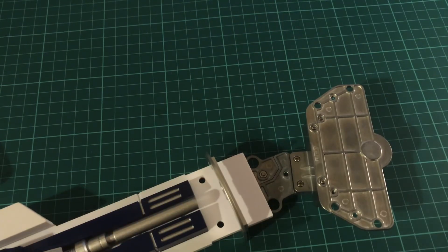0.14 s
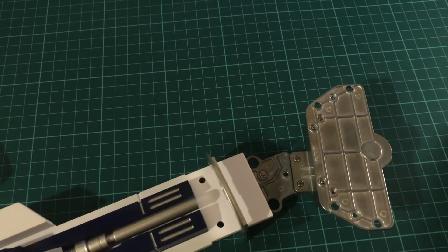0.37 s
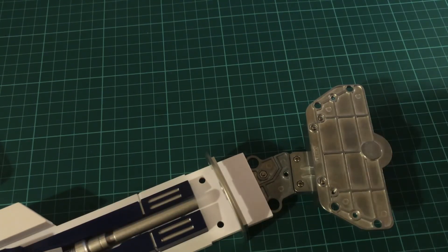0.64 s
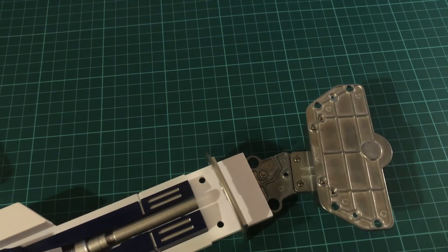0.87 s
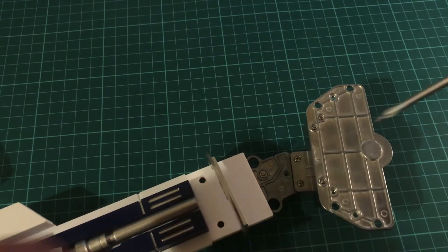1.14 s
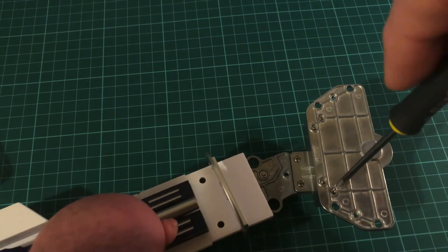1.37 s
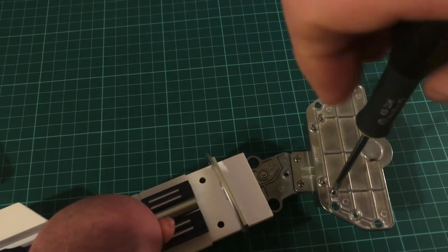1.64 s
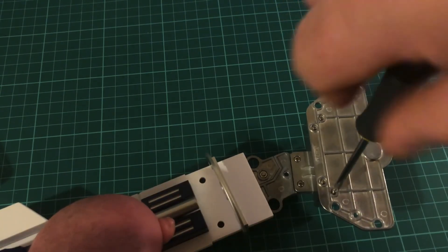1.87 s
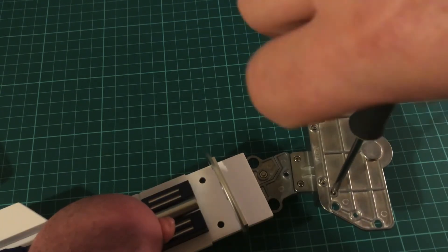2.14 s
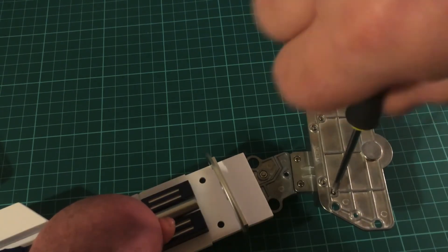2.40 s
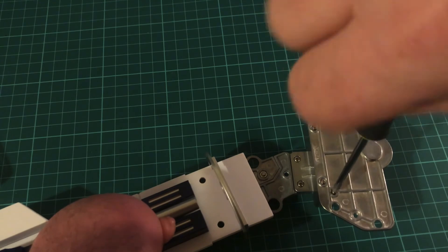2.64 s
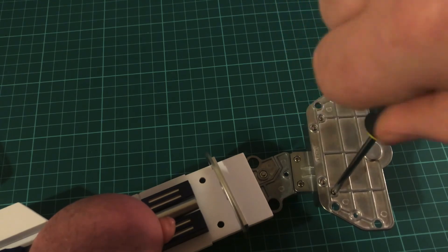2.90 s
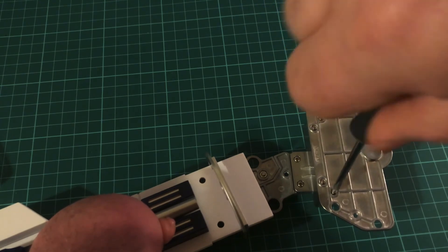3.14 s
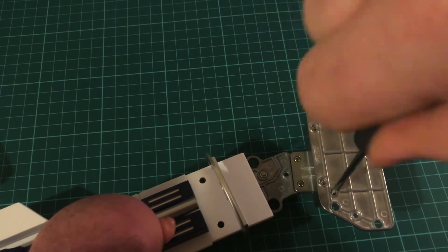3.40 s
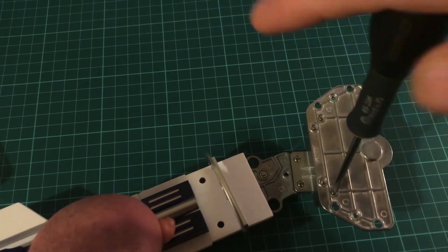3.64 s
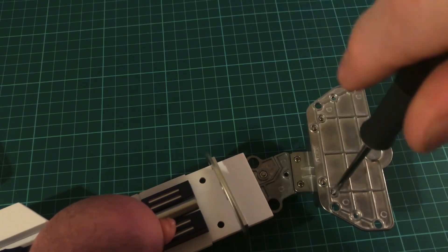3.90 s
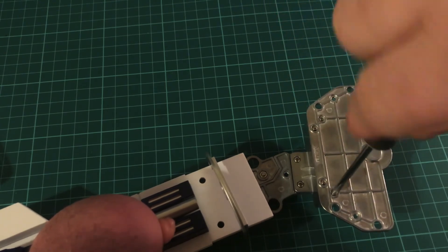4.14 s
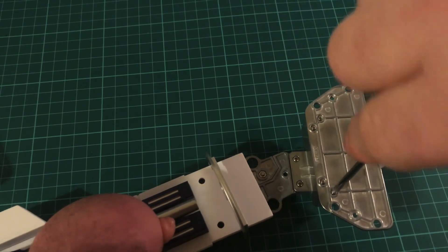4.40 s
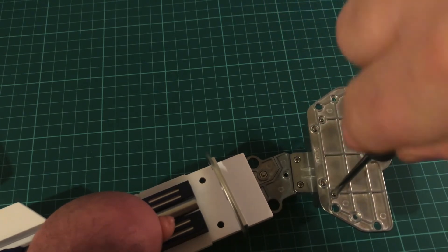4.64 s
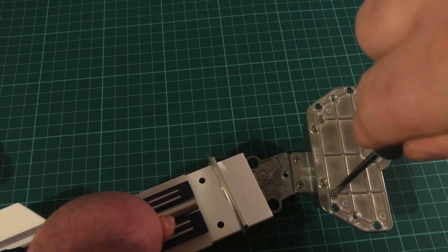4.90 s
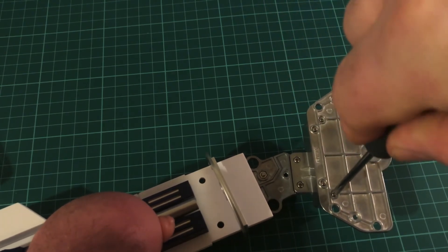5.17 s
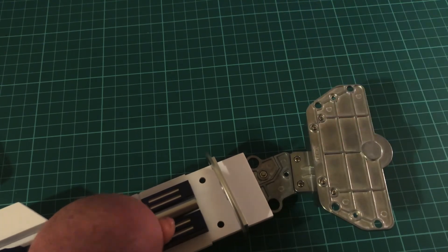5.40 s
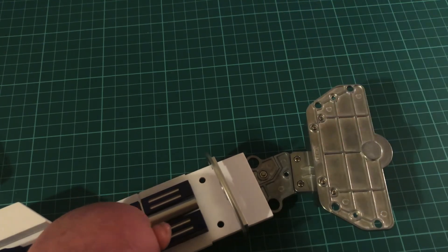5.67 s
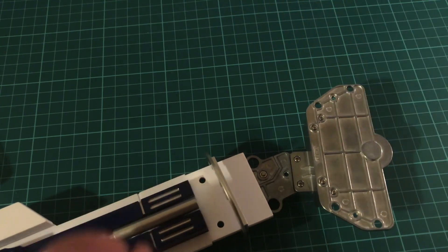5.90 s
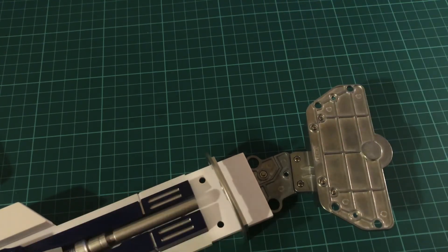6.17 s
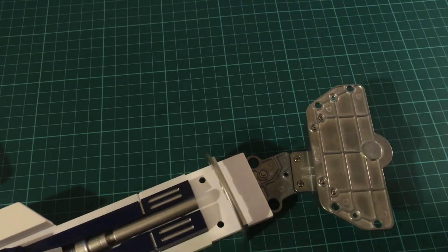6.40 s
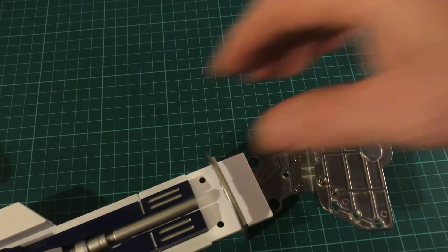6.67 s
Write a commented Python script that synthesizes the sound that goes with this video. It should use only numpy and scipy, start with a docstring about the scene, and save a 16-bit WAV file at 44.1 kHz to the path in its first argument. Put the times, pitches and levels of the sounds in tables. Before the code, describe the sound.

A small screwdriver ticks and knocks on a thin metal plate over low rumble, then a dropped tool clatters and rolls on the table.

```python
"""A table in a quiet room, a thin cast plate lying on a mat, the camera's microphone close above.
From the start a low table rumble, camera hiss and a faint whine lie underneath.
From about 1 s a small screwdriver works screws: its tip ticks and knocks, ringing the plate's modes.
At 5.5 s hiss and whine grow louder, and hands and sleeve brush the mat once more.
At 6.07 s the tool drops on the table; trains of contacts make it rattle, bounce and roll to the end."""
import sys
import numpy as np
from scipy import signal
from scipy.fft import rfft, irfft
from scipy.io import wavfile
from scipy.ndimage import uniform_filter1d

SR = 44100
rng = np.random.default_rng(int(sys.argv[2]) if len(sys.argv) > 2 else 0)


def attenuation_scalar(level_db):
    """Turn a level in dB into a linear amplitude multiplier (20 dB per decade)."""
    decades = np.asarray(level_db, float) / 20
    return 10 ** decades


def master(y):
    """Save y as 16-bit WAV."""
    cut = np.clip(np.atleast_2d(y).T, -1, 1)
    pcm = np.round(cut * 32767)  # scale
    wavfile.write(sys.argv[1], SR, pcm.astype(np.int16))


N = 299439


def read(points, hz):
    """A spectrum at the given frequencies, interpolated over log frequency."""
    f, value = np.transpose(points)
    return np.interp(np.log(hz + 1), np.log(f + 1), value)


def columns(rows):
    """Every control of a curve, sample by sample."""
    s, *values = np.transpose(rows)
    return [np.interp(np.arange(N) / SR, s, v) for v in values]


def evened(x):
    """Scaled to rms 1."""
    return x / np.sqrt(np.mean(x ** 2) + 1e-20)


def add(out, s, db, sound):
    """Lays a sound into the mix at its peak level."""
    out[round(s * SR):][:len(sound)] += attenuation_scalar(db) * sound / abs(sound).max()


def resonate(x, hz, width):
    """Shifts hz down to zero, smooths, and shifts back: a resonance of gain 1."""
    turn = np.exp(2j * np.pi * np.cumsum(hz * np.ones(len(x))) / SR)
    r = np.exp(-np.pi * width / SR)
    return 2 * (turn * signal.lfilter([1 - r], [1, -r], x / turn)).real


def ring(modes, near_hz=1, favour_db=0):
    """Response to one contact, in parts: body, ring, edge; the spot struck favours the modes near one pitch."""
    t, parts = np.arange(4096) / SR, np.zeros((3, 4096))
    for hz, width, db in modes:
        near = np.exp(-(np.log2(hz / near_hz) / 0.084) ** 2)
        level = attenuation_scalar(db + favour_db * near)
        width = width / (1 + .5 * near)  # a favoured mode is damped less
        start = (1 - np.exp(-3 * hz * t)) ** 2  # a contact lasts a moment, so no mode starts at once
        decay = np.exp(-np.pi * width * t)
        part = np.searchsorted([1450, 4200], hz)  # Hz, where ring and edge begin
        parts[part] += level * width * start * decay * np.sin(2 * np.pi * hz * t)
    return parts


def chatter(ms):
    """A short burst of uneven contacts, dying away with time constant ms (at least 0.3)."""
    u = 1000 * np.arange(2048) / SR / max(ms, .3)
    happens = rng.random(2048) < .15
    contacts = rng.standard_normal(2048) * happens * (1 - np.exp(-8 * u)) * np.exp(-u)
    contacts[0] = 0.51
    return contacts


# thin tones of the camera electronics, before waver and swell: (frequency [Hz], level [dB rms])
WHINE_TONES = [(1707, -91), (3042, -94.5), (4054, -92), (5075, -98), (6089, -96.5), (7101, -99.5),
               (8064, -94.5), (8441, -101), (9135, -96.5), (10148, -100), (12172, -101), (13184, -103)]
# hiss and whine grow louder: (time [s], gain [dB])
SWELL_CURVE = [(0, -1), (5.53, -0.5), (5.56, 6), (6, 5), (6.4, 8), (6.79, 8.5)]


def whine():
    """Sines, each wavering in level, all following the swell."""
    t, knots = np.arange(N) / SR, np.arange(0, N / SR + 1, .12)
    waver_db = 1.7 * rng.standard_normal((len(WHINE_TONES), len(knots)))
    out = np.zeros(N)
    for (hz, db), waver in zip(WHINE_TONES, waver_db):
        level = np.sqrt(2) * attenuation_scalar(db + np.interp(t, knots, waver))
        out += level * np.sin(2 * np.pi * (hz * t + rng.random()))
    return attenuation_scalar(columns(SWELL_CURVE)[0]) * out


# relative spectrum of room air and camera noise: (frequency [Hz], density [dB per Hz])
HISS_SPECTRUM = [(59, -16), (100, -10.5), (188, -6.5), (223, -7.5), (258, -1.5), (306, -25), (340, -9.5),
                 (386, -18), (640, -23), (1730, -27.5), (2320, -31.5), (3050, -33), (7730, -41),
                 (8230, -38), (15500, -46)]


def hiss():
    """Shaped noise of room air and camera with slight patches; the swell lifts the treble most."""
    hiss_db = -74  # dB rms of the part above 500 Hz, over the first 5 s
    hz, frames = np.fft.rfftfreq(2048, 1 / SR), N // 512 + 5
    a, b, patches = rng.standard_normal((frames, 1025, 3)).T
    patches = evened(uniform_filter1d(uniform_filter1d(patches, 12, 0), 6, 1))
    frame_swell_db = np.interp(np.arange(frames) * 512 / SR, *np.transpose(SWELL_CURVE))
    swell_db = np.outer(read([(300, 0.9), (13000, 1.0)], hz), frame_swell_db)
    shape = attenuation_scalar(read(HISS_SPECTRUM, hz))
    z = (a + 1j * b) * shape[:, None] * attenuation_scalar(1.6 * patches + swell_db)
    air = signal.istft(z, nperseg=2048, noverlap=1536)[1][:N]
    upper = np.sqrt(np.sum(shape[hz > 500] ** 2) / np.sum(shape ** 2))
    return attenuation_scalar(hiss_db) * air / air[:5 * SR].std() / upper


# modes of the table under the mat, width before any favour: (frequency [Hz], width [Hz], level [dB])
TABLE_MODES = [(137, 360, -6.5), (181.4, 71, -0.5), (225.5, 27, -1.5), (263.4, 40, 0), (323.3, 107, -9.5)]


def table_thud(near_hz=1, favour_db=0):
    """The table's answer to one contact; neighbouring modes swing in opposite sense: it stays dark above them."""
    return sum((-1) ** k * ring([mode], near_hz, favour_db)[0] for k, mode in enumerate(TABLE_MODES))


# low shaking, before its lumps: (time [s], level [dB rms])
RUMBLE_CURVE = [(0, -58.5), (1.5, -57), (2.2, -54), (3.3, -50), (3.6, -55), (4.5, -52), (5.3, -51),
                (5.9, -44), (6.3, -41.5), (6.79, -42)]
# power share of the rumble gathered on one note near 52 Hz: (time [s], share [0-1])
STEADY_SHARE = [(0, 0.17), (3.5, 0.77), (4.5, 0.58), (6.79, 0.96)]
# a hum near 145 Hz: (time [s], level [dB rms])
HUM_CURVE = [(5.5, -77), (5.6, -53), (5.85, -43.5), (5.97, -52.5), (6.3, -54.5), (6.5, -59.5), (6.6, -76)]
# the table modes murmur: (time [s], level [dB rms])
MURMUR_CURVE = [(4.2, -91), (4.37, -62), (4.6, -65), (4.78, -60.5), (5, -68.5), (5.52, -62.5), (5.61, -55),
                (5.9, -61), (6.05, -77), (6.79, -68)]


def rumble():
    """Lumpy low shaking of table and camera stand from resonated noise, and the hums above it."""
    lump_db, lump_s = 4, 0.072  # spread and spacing of the lumps
    db, share = columns(RUMBLE_CURVE)[0], np.clip(columns(STEADY_SHARE)[0], 0, 1)
    a, b, c, d = rng.standard_normal((N, 4)).T
    broad = evened(resonate(resonate(a, 74.8, 44), 53.3, 40))
    note = evened(resonate(resonate(d, 51.3, 5.5), 43.2, 21))
    t, knots = np.arange(N) / SR, np.arange(0, N / SR + 1, lump_s)
    lumps = np.interp(t, knots, rng.standard_normal(len(knots)))
    level = uniform_filter1d(attenuation_scalar(db + lump_db * lumps), 1500)
    low = level * (np.sqrt(1 - share) * broad + np.sqrt(share) * note)
    rough_hum = evened(resonate(resonate(b, 145.4, 7.2), 125.6, 30))
    hum = evened(np.sin(2 * np.pi * 145 * t) + 0.49 * rough_hum)
    murmur = evened(signal.oaconvolve(c, table_thud())[:N])
    return low + attenuation_scalar(columns(HUM_CURVE)[0]) * hum + attenuation_scalar(columns(MURMUR_CURVE)[0]) * murmur


# the table is jolted: (middle [s], peak level [dB rms], half length to 1/e [ms], frequency [Hz])
JOLT_SWINGS = [(.6, -50, 39, 70), (1.797, -32, 17, 57.65), (2.51, -49, 33, 67.5), (4.12, -42.5, 34, 51),
               (4.821, -38.5, 89, 50.3), (5.01, -44, 15, 49), (6.05, -47, 62, 48.2),
               (6.259, -30.5, 21, 61.5), (6.42, -36.5, 160, 47.7), (6.79, -35, 78, 53.87)]


def jolts():
    """Short low swings of table and camera stand: sines under bell-shaped envelopes."""
    t, out = np.arange(N) / SR, np.zeros(N)
    for s, db, ms, hz in JOLT_SWINGS:
        bell = np.exp(-(1000 * (t - s) / ms) ** 2)
        out += np.sqrt(2) * attenuation_scalar(db) * bell * np.sin(2 * np.pi * (hz * t + rng.random()))
    return out


def room(x):
    """Reverberation by sparse taps of random sign; the treble dies first."""
    taps = np.zeros(SR // 2)
    at = np.arange(150, len(taps) - 20, 20)
    taps[at + rng.integers(0, 20, len(at))] = rng.choice([-1., 1.], len(at))
    hz, t, z = signal.stft(taps, SR, nperseg=256)
    decay_s = read([(200, 0.22), (2000, 0.095), (12000, 0.078)], hz)  # time to fall 60 dB
    tail = signal.istft(z * attenuation_scalar(-60 * t / decay_s[:, None]), SR, nperseg=256)[1]
    return signal.fftconvolve(x, tail / np.linalg.norm(tail))[:N]


# hands and sleeve brush the mat:
# (middle [s], peak level [dB rms], half length to 1/e [ms], tilt above 300 Hz [dB per octave])
BRUSH_STROKES = [(0.926, -53, 16.6, -6), (1.455, -62.5, 10, -2.5), (1.78, -43, 9.1, -6.5),
                 (5.779, -58.5, 9.5, -6.5), (5.81, -64, 22, -2.5), (5.905, -64, 6.8, -5.5)]


def brushes():
    """Soft swells of grainy broad noise, faintly coloured by the plate."""
    out, t, hz = np.zeros(N), np.arange(-2048, 2048) / SR, np.fft.rfftfreq(4096, 1 / SR)
    plate_colour = abs(rfft(ring(PLATE_MODES).sum(0))) * hz
    for s, db, ms, tilt_db in BRUSH_STROKES:
        grains = rng.standard_normal(4096) * attenuation_scalar(1.2 * rng.exponential(1, 4096))
        colour = attenuation_scalar(tilt_db * np.log2(np.maximum(hz, 300) / 1000)) * hz / (hz + 200)
        colour *= 1 + 0.067 * abs(evened(plate_colour))  # the plate answers a little
        noise = evened(irfft(rfft(grains) * colour))
        out[round(s * SR) - 2048:][:4096] += attenuation_scalar(db) * noise * np.exp(-(1000 * t / ms) ** 2)
    return out


# the hand's weight or the handle thumps the table: (time [s], peak level [dB], favoured frequency [Hz])
TABLE_THUMPS = [(0.9849, -53, 262), (1.371, -49, 200), (1.4809, -45.5, 245), (1.784, -32, 260),
                (2.164, -53, 250), (2.613, -46.5, 267), (2.7187, -41.5, 264), (2.9715, -49, 275),
                (3.083, -41, 254), (3.2137, -50.5, 260), (3.3356, -49.5, 262), (6.0671, -16.5, 263),
                (6.1041, -22.5, 323), (6.1737, -29, 265), (6.237, -19.5, 188), (6.2571, -20.5, 226)]


def thuds():
    """Dull thumps in the table alone: a short chatter rings its modes."""
    out = np.zeros(N + 8192)
    for s, db, near_hz in TABLE_THUMPS:
        add(out, s, db, signal.fftconvolve(chatter(ms=3.1), table_thud(near_hz, favour_db=6.5)))
    return out[:N]


# a loose screw pings on one note: (time [s], peak level [dB], frequency [Hz], width [Hz])
SCREW_PINGS = [(1.95, -48.5, 1590, 90), (2.733, -55, 2220, 120), (5.825, -55, 2600, 110)]


def pings():
    """Single short notes, each one decaying mode."""
    out = np.zeros(N + 8192)
    for s, db, hz, width in SCREW_PINGS:
        add(out, s, db, ring([(hz, width, 0)]).sum(0))
    return out[:N]


# four layers: the tool rattles to rest, rebounds, then rolls, its ring moving from about 3.1 kHz
# towards 2 kHz as a second, lower-pitched layer swells; one curve each of (time [s], ring level [dB rms])
ROLL_CURVES = [
    [(6.07, -29.5), (6.168, -41), (6.232, -57)],
    [(6.262, -49.5), (6.294, -61.5), (6.36, -78.5)],
    [(6.36, -71), (6.38, -59), (6.44, -64.5), (6.58, -70), (6.74, -60.5), (6.79, -65)],
    [(6.45, -75), (6.62, -71), (6.75, -62.5), (6.79, -66)],
]
# for each layer: (contacts [per s], size spread [dB], top frequency [Hz], favoured frequency [Hz],
# favour [dB], passes through the modes [count])
ROLL_CONTACTS = [(1846, 2, 6400, 1947, 13, 1.22), (2700, 2.5, 4500, 1700, 17, 1.2),
                 (5220, -3, 3000, 3083, 19.5, 1.57), (5000, 2.5, 2600, 2040, 4, 1.73)]
# for each layer, at its start and at its end, against the ring: (thud [dB], body [dB], edge [dB])
ROLL_MIX = [((1, -1, -14), (11, 5, -14)), ((24.7, 10, -4.5), (20.2, 14, 8)), ((-6.5, -10, -9),
            (-10, -17, -5)), ((-1, 3, -25), (0, -4, -27))]


def rolling():
    """Uneven contacts ring tool and table: hard and sparse as it rattles, soft and dense as it rolls."""
    out, t = np.zeros(N), np.arange(N) / SR
    for rows, (first, last), contact_row in zip(ROLL_CURVES, ROLL_MIX, ROLL_CONTACTS):
        per_s, size_db, top_hz, near_hz, favour_db, passes = contact_row
        size = attenuation_scalar(size_db * np.minimum(rng.exponential(1, N), 5))
        contacts = size * rng.choice([-1, 1], N) * (rng.random(N) < per_s / SR)
        contacts = signal.sosfilt(signal.butter(2, top_hz, fs=SR, output="sos"), contacts)
        parts = [table_thud(), *ring(TOOL_MODES, near_hz, favour_db)]
        # more than one pass darkens the gaps between modes
        parts = [irfft(rfft(p, 8192) ** passes) for p in parts]
        thud, body, mid, edge = (evened(signal.oaconvolve(contacts, p)[:N]) for p in parts)
        start_s, end_s = rows[0][0], rows[-1][0]
        thud_db, body_db, edge_db = columns([(start_s, *first), (end_s, *last)])
        sound = mid + attenuation_scalar(thud_db) * thud + attenuation_scalar(body_db) * body + attenuation_scalar(edge_db) * edge
        moving = uniform_filter1d(1. * (t > start_s) * (t < end_s), 150)
        out += moving * attenuation_scalar(columns(rows)[0]) * sound
    return out


def blows(rows, modes, favour_db, chatter_ms, growth, thud_db):
    """Each blow rings the object and thuds the table; full-bodied blows thud more.

    chatter_ms holds at -38 dB and grows by growth dB per dB softer; thud_db is over the body."""
    edge_ms = 2.5  # only the first, hardest contacts of a blow reach the edge modes
    out = np.zeros(N + 8192)
    for s, db, body_db, edge_db, near_hz in rows:
        contacts = chatter(chatter_ms * attenuation_scalar(-growth * (db + 38)))
        body, mid, edge = ring(modes, near_hz, favour_db)
        add(out, s, db + body_db + thud_db, signal.fftconvolve(contacts, table_thud()))
        add(out, s, db + body_db, signal.fftconvolve(contacts, body))
        add(out, s, db, signal.fftconvolve(contacts, mid))
        hard = contacts * np.exp(-1000 * np.arange(len(contacts)) / SR / edge_ms)
        add(out, s, db + edge_db, signal.fftconvolve(hard, edge))
    return out[:N]


# handle on the table; body and edge against the ring:
# (time [s], ring peak [dB], body [dB], edge [dB], favoured frequency [Hz])
HANDLE_KNOCKS = [(6.0678, -15, -12, 0, 870), (6.0735, -25.5, 8, -10, 1030), (6.1029, -24, 2, -3, 1110),
                 (6.1294, -29, 7.5, -13, 960), (6.1467, -28.5, -5, -0.5, 1820), (6.1724, -37, -1, -7, 966),
                 (6.2358, -32, 14.5, -24, 524.5), (6.2477, -28.5, 6, 10.5, 4350),
                 (6.3105, -42.5, -1, 3, 540), (6.38, -46, -13.5, -18, 3180), (6.458, -61.5, -4, 11.5, 520)]
# modes of the tool, width before any favour: (frequency [Hz], width [Hz], level [dB])
TOOL_MODES = [(547.3, 56, -7), (860, 82, -2.5), (1078, 340, 1.5), (1217, 98, -6), (1650, 29, -27),
              (1878, 63, 8.5), (2050, 203, 11), (2450, 32, -12), (3180, 240, -1), (3320, 170, 6.5),
              (3635, 210, 5.5), (4196, 320, 1), (4500, 194, 11), (5120, 1150, 10), (6300, 430, 2),
              (7750, 260, -10), (11300, 1700, -6)]


def handle_knocks():
    """The dropped handle strikes the table; here the softer blows chatter more briefly."""
    return blows(HANDLE_KNOCKS, TOOL_MODES, favour_db=23, chatter_ms=3, growth=-0.28, thud_db=-2)


# tip on screw and plate; body and edge against the ring:
# (time [s], ring peak [dB], body [dB], edge [dB], favoured frequency [Hz])
TIP_TAPS = [(0.9855, -63, 5.5, 1.5, 1510), (1.4645, -62.5, 18.5, -8, 3990), (1.7755, -45, 12, -18, 1760),
            (1.784, -21, -4.5, -8, 2013), (1.7904, -24.5, -8.5, -8, 3490), (1.95, -56.5, -1.5, -7, 2670),
            (2.0532, -60.5, -3, 0, 1700), (2.2565, -54, 1.5, -8, 2010), (2.2726, -55, 10.5, -8, 1950),
            (2.3837, -53, -6, -21, 2200), (2.4935, -64.5, 9.5, -18, 2050), (2.5202, -60, 0, -7, 1830),
            (2.613, -51.5, 6.5, -8, 2080), (2.7175, -48, -3, -14, 2200), (2.731, -55, 2, -7, 2180),
            (2.8714, -59, -6, -2, 3500), (2.9718, -44.5, 4, -15, 2200), (3.0834, -45, -0.5, -5.5, 2270),
            (3.0946, -52, -3, -5, 2000), (3.4278, -55.5, -1.5, -8, 2180), (3.697, -27.5, -6.5, -14, 2700),
            (3.7958, -48.5, -1, -10, 1990), (3.8052, -39.5, -4, -18, 2100),
            (3.8525, -25, -10.5, -17.5, 2850), (3.8564, -32.5, -8.5, -8.5, 2730),
            (3.9428, -57.5, 6.5, -10, 2000), (4.0204, -47.5, -4, -15, 1994), (4.2176, -42, -32, 6.5, 5370),
            (4.2799, -58.5, -6, -8, 2450), (5.4093, -55.5, -29, 5.5, 2900)]
# modes of the cast plate, width before any favour: (frequency [Hz], width [Hz], level [dB])
PLATE_MODES = [(489, 175, 10.5), (692, 200, 11.5), (834.5, 63, 7), (1123, 300, -6.5), (1590, 330, 7),
               (2074, 430, 6.5), (2180, 340, -5), (2540, 720, 21.5), (2850, 380, 4), (3140, 2140, 19.5),
               (3500, 140, -0.5), (4830, 78, -37), (5570, 230, -25.5), (6395, 94, -10), (7210, 920, -13.5),
               (8770, 2300, -17.5), (9570, 3200, -27.5), (11100, 670, -78)]


def tip_taps():
    """The tip ticks and knocks on screw and plate; soft taps chatter longer."""
    return blows(TIP_TAPS, PLATE_MODES, favour_db=28.5, chatter_ms=5, growth=0.27, thud_db=-9.5)


def scene():
    """Tool sounds with their room, over the floor of hiss, whine and rumble."""
    near = brushes() + thuds() + pings() + rolling() + handle_knocks() + tip_taps()
    floor = whine() + hiss() + rumble() + jolts()
    return (near + attenuation_scalar(-18) * room(near) + floor)[None]


def band_limit(x):
    """A steep low-pass at the top of the band."""
    return signal.sosfilt(signal.butter(12, 16380, fs=SR, output="sos"), x)


def record(dry):
    """The microphone loses the lowest bass and the top treble."""
    bass_cut = signal.sosfilt(signal.butter(2, 33, "high", fs=SR, output="sos"), dry)
    top_cut = signal.sosfilt(signal.butter(10, 15700, fs=SR, output="sos"), bass_cut)
    return band_limit(top_cut)


dry = scene()
out = record(dry)
master(out)
```